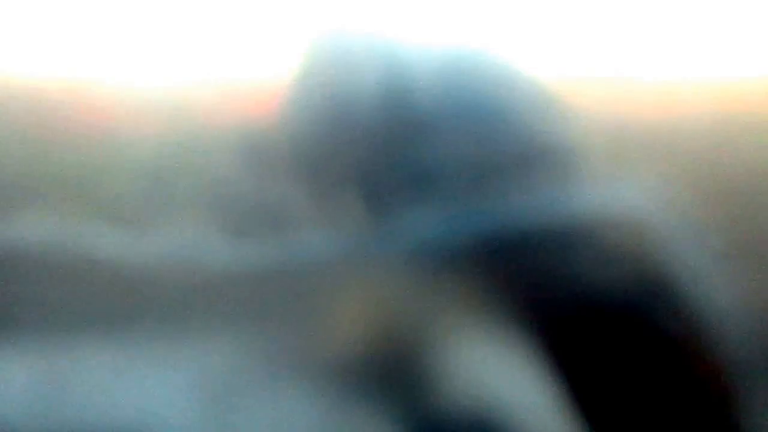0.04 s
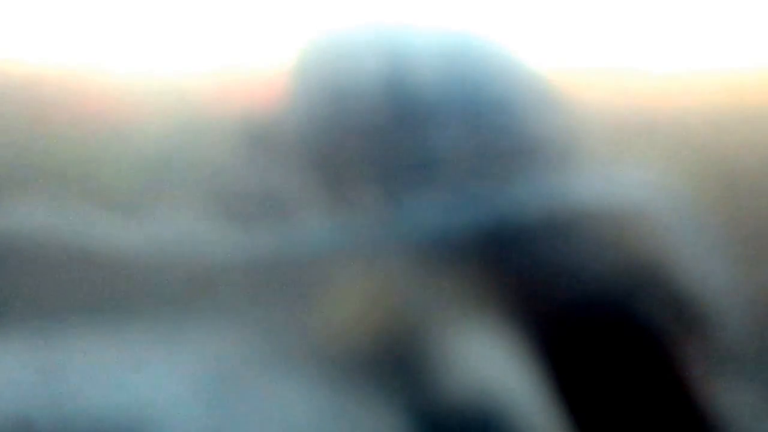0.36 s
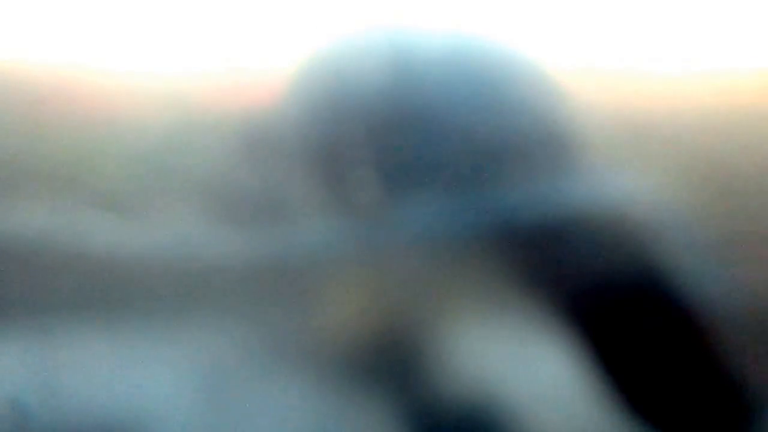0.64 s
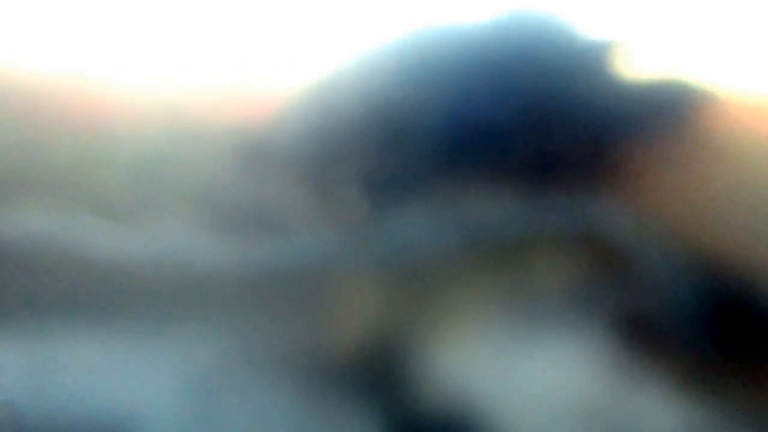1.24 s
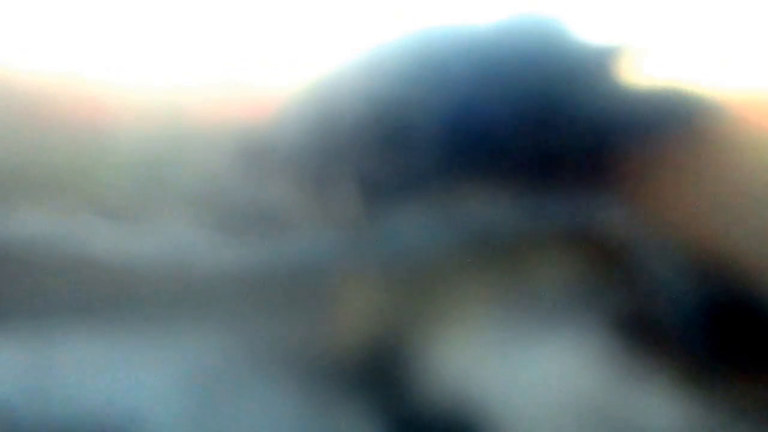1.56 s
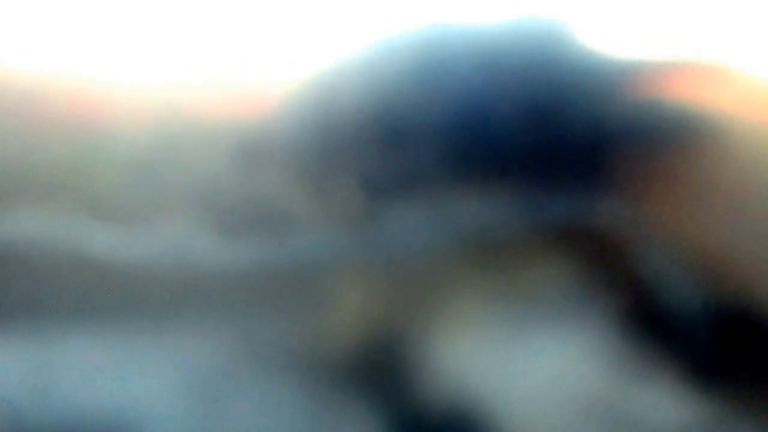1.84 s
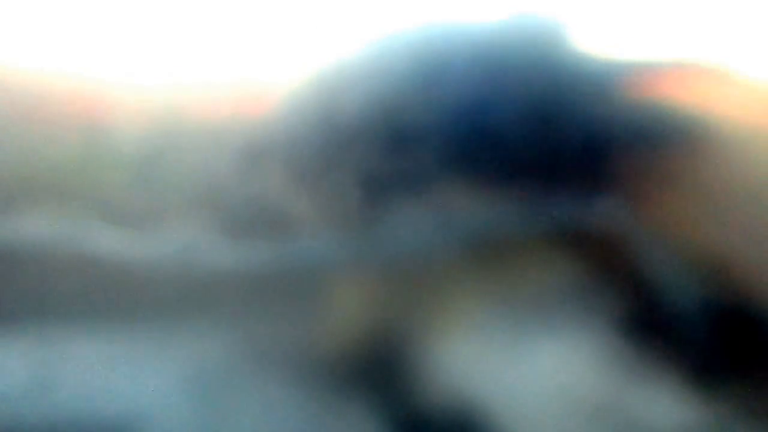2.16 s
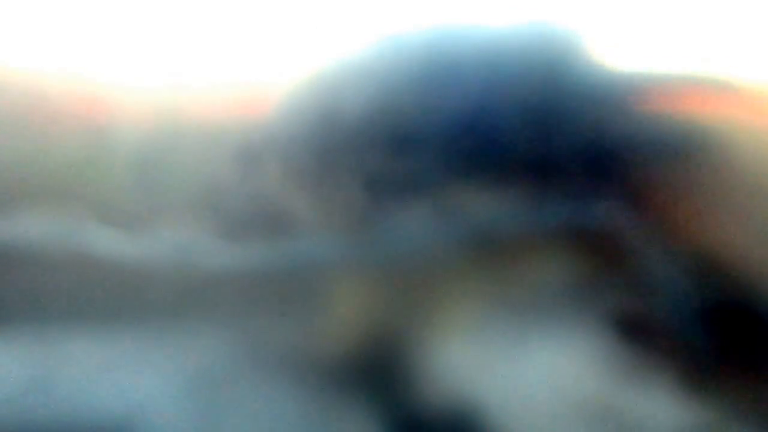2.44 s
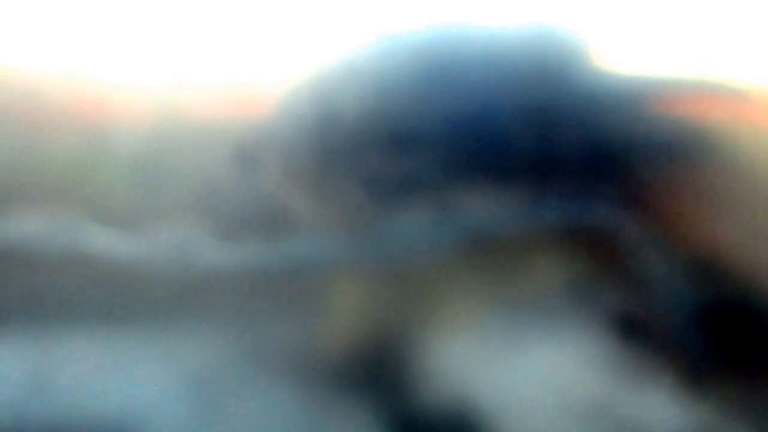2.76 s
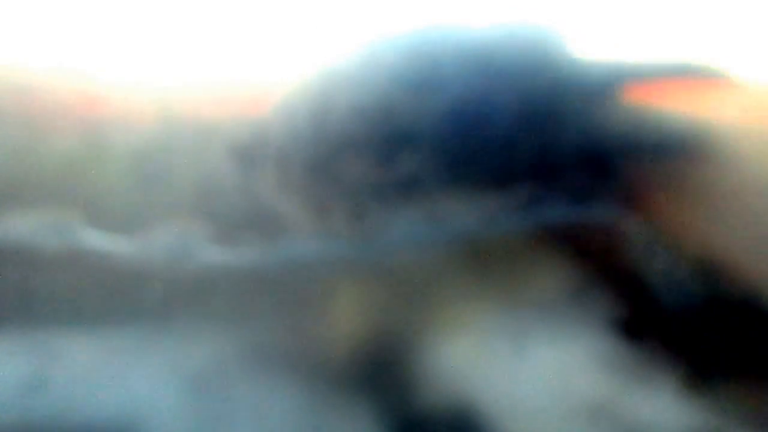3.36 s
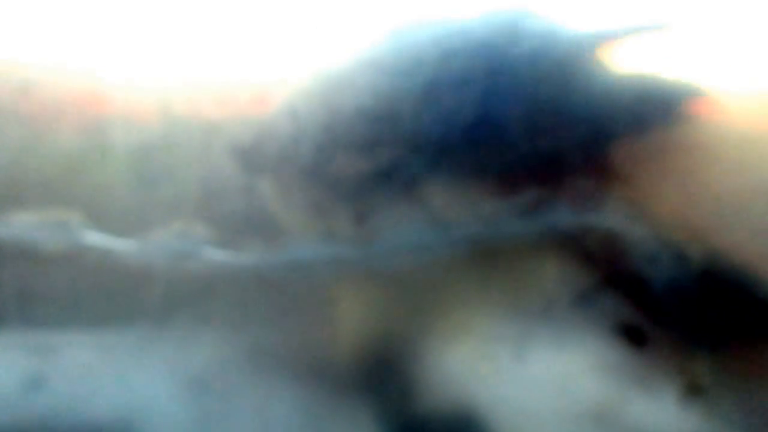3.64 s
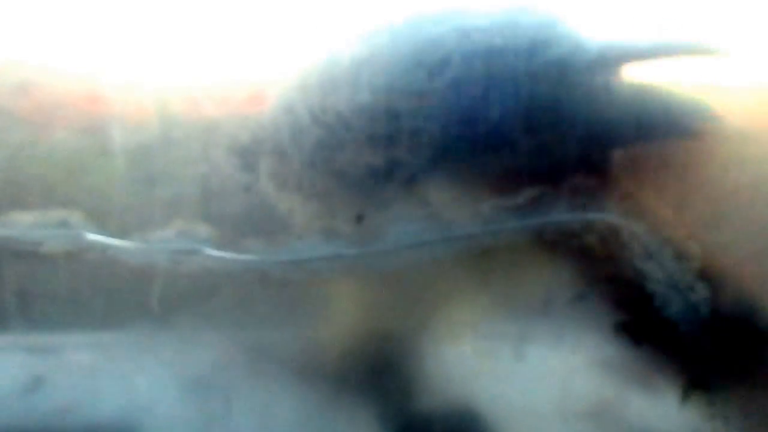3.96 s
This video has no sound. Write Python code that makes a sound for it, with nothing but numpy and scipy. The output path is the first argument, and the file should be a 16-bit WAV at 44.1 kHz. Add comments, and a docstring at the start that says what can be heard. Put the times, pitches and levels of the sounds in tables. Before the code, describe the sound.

A low rumble of distant traffic cuts in at 0.2 seconds and holds steady, with microphone hiss and a machinery hum that comes and goes. Close by, a camcorder's lens motor ticks faintly and irregularly until 2.8 seconds. Its housing gives small dull clicks at about 0.6, 0.7 and 2.2 seconds. From 3 seconds a faint, thin motor whine runs to the end at 4 seconds.

```python
"""Camcorder in distant traffic

A camcorder starts up in the steady rumble of far traffic and machinery, whose hum comes and goes.
Right by its microphone the lens motor ticks in single steps, hunting for focus, then runs with a
thin whine. The housing clicks three times; electronic hiss and a faint line whistle lie over it all."""
import sys
import numpy as np
from scipy.fft import rfft, irfft, next_fast_len
from scipy.io import wavfile
from scipy.ndimage import map_coordinates

SR = 44100
rng = np.random.default_rng(int(sys.argv[2]) if len(sys.argv) > 2 else 0)


def persist_wave(psi):
    """Save psi, clipped to +-1, as 16-bit WAV."""
    counts = np.round(np.clip(psi, -1, 1) * 32767).astype(np.int16)
    wavfile.write(sys.argv[1], SR, np.atleast_2d(counts).T)


N = 176400
T = np.arange(N) / SR

# Spectrum of the traffic's low rumble, far off: frequency_hz, relative_db
RUMBLE_SPECTRUM = [(10, -21), (20, 0), (32, -2.5), (50, -2), (86, 0), (113, 0.4), (140, 0.8), (175, 0),
                   (210, -6), (260, -11), (330, -17), (380, -23), (490, -50.5)]
# Spectrum of tyres on the distant road: frequency_hz, relative_db
TYRE_SPECTRUM = [(240, -43), (400, 0), (510, 0.5), (663, -2), (743, 1), (960, 0), (1050, 3), (1220, -7),
                 (1520, -2), (1720, -7), (1830, -16.5), (2000, -19), (2600, -27.5), (4400, -120)]
# Shape of the rumble's swell, tripled about its mean when played: time_s, relative_db
RUMBLE_SWELL = [(.25, -38.5), (.6, -38.5), (1, -38.5), (1.5, -37.5), (1.85, -38), (2.2, -38), (2.7, -38.5),
                (3.35, -37.5), (4, -38.5)]

def traffic(rumble_db=-39, roar_db=-49.5):
    """Distant traffic: a slowly swelling rumble under the even roar of tyres."""
    shape_db = curve(RUMBLE_SWELL)
    swell_db = 3 * (shape_db - shape_db.mean())
    rumble = amp(rumble_db + swell_db + 0.17 * wobble(7.8)) * noise(RUMBLE_SPECTRUM)
    roar = amp(roar_db + 0.3 * wobble(10)) * noise(TYRE_SPECTRUM)
    return rumble + roar


# Steady drone bands of distant machinery: pitch_hz, width_hz, level_db
DRONE_BANDS = [(28, 18, -48.5), (95.1, 8.1, -48), (234.7, 14.3, -55.5), (270.8, 7.8, -63), (300.5, 19, -61),
               (471.3, 5.5, -71), (529, 21, -74), (743, 1.4, -67), (1061, 12, -66.5)]
# Its low throbbing note, as it reaches the microphone: time_s, level_db
THROB_LEVELS = [(.25, -64), (.6, -52), (1, -44.5), (1.15, -50), (1.45, -52), (1.85, -42.5), (2.05, -49),
                (2.28, -66), (2.42, -44), (2.85, -49), (3.35, -43), (3.6, -48), (4, -53)]
# Its higher hum, coming and going: time_s, level_db
HUM_LEVELS = [(.25, -64.5), (.48, -54.5), (.75, -57), (.95, -76), (2, -76), (2.3, -54), (2.6, -69),
              (2.9, -57), (3.35, -53.5), (3.55, -64), (4, -61)]

def machinery(hum_hz=374.3, throb_hz=142.76):
    """Far machines: a blurred drone, with a hum and a throb that waver in pitch and level."""
    hum_gain = amp(curve(HUM_LEVELS) + 1.2 * wobble(20))
    hum = hum_gain * tone(hum_hz + 1.69 * wobble(9.2))
    throb_gain = amp(curve(THROB_LEVELS) + 2 * wobble(12))
    throb = throb_gain * tone(throb_hz + 3.8 * wobble(16))
    return fuzzy_lines(DRONE_BANDS) + throb + hum


# Single focus steps, right beside the microphone: start_s, relative_db, brightness_db
FOCUS_STEPS = [(.221, -45, 4), (.2607, -49, 0), (.3412, -44, -3), (0.3814, -46, -2), (0.461, -47, 2),
               (.501, -50, 2), (.5412, -47, -2), (0.5973, -44, 0), (0.661, -45, -1), (0.861, -48, 2),
               (1.088, -45.5, -1), (1.141, -44, -1), (1.221, -47.5, 1), (1.2616, -52, 0), (1.341, -45, -6),
               (1.381, -45, -4), (1.5012, -49.5, 2), (1.5812, -47.5, 3), (1.781, -54, 0), (1.8212, -49, 2),
               (2.0615, -50, 0), (2.1015, -52, 7), (2.141, -47, 9), (2.2215, -45.5, 8), (2.5412, -47, 6),
               (2.6215, -51, 15), (2.7015, -49, 6), (2.765, -53, 7), (2.822, -46, 4)]
# Resonances of the lens barrel: pitch_hz, relative_db, t60_s
BARREL_MODES = [(2750, -5.5, 0.016), (3070, -2.5, 0.0047), (3400, -1, 0.0066), (4000, -10, 0.0046),
                (5200, -7, 0.0028), (6670, -4.5, 0.0025)]
# Whine of the running motor: time_s, level_db
WHINE_LEVELS = [(2.88, -95), (2.97, -74), (3.11, -73), (3.135, -68), (3.5, -67.5), (3.7, -67), (4, -68.5)]

def lens_motor(whine_hz=2880, step_gain_db=4):
    """Single steps of the motor ring the barrel; continuous running gives a pure whine."""
    whine_gain = amp(curve(WHINE_LEVELS) + 0.64 * wobble(12))
    out = whine_gain * np.sqrt(2) * np.sin(2 * np.pi * whine_hz * T)
    for start_s, relative_db, brightness_db in FOCUS_STEPS:
        tick = ring(BARREL_MODES, attack_s=0.00012, bright_db=brightness_db, split_hz=4400)
        add(out, start_s, amp(relative_db + step_gain_db) * tick)
    return out


# Clicks in the body that holds the microphone: start_s, relative_db, brightness_db
HOUSING_CLICKS = [(0.5987, -38, -1), (.6825, -42.5, 8), (2.221, -44, 9)]
# Resonances of that body: pitch_hz, relative_db, t60_s
HOUSING_MODES = [(870, 2, .026), (1310, -2, 0.018), (1570, 2, 0.0091), (2200, -6, .01), (2850, -12, .007)]

def housing():
    """Small dull knocks ring the camera body, very close."""
    out = np.zeros(N)
    for start_s, relative_db, brightness_db in HOUSING_CLICKS:
        knock = ring(HOUSING_MODES, attack_s=0.00031, bright_db=brightness_db, split_hz=1900)
        add(out, start_s, amp(relative_db) * knock)
    return out


# Hiss of the microphone's preamplifier: frequency_hz, relative_db
HISS_SPECTRUM = [(1500, -11), (1850, 3), (2400, -0.5), (3000, -1.4), (4000, -3.5), (7300, -6.5),
                 (7650, -6.5), (7850, -15), (8150, -6.5), (11500, -12.5), (15500, -29)]
# Noisy skirt around the weak whistle: pitch_hz, width_hz, level_db
WHISTLE_SKIRT = [(3150, 240, -76)]

def electronics(hiss_db=-61, whistle_hz=3100, whistle_db=-77, line_hz=15734, line_db=-79.5):
    """The camera's circuits add hiss, a weak unsteady whistle and the high line-scan tone."""
    whistle = amp(whistle_db + 1.8 * wobble(17)) * np.sin(2 * np.pi * whistle_hz * T)
    line_tone = amp(line_db) * np.sin(2 * np.pi * line_hz * T)
    hiss = amp(hiss_db) * noise(HISS_SPECTRUM)
    return hiss + np.sqrt(2) * (whistle + line_tone) + fuzzy_lines(WHISTLE_SKIRT)


def ring(modes, attack_s, bright_db, split_hz):
    """A tapped plastic part rings; brightness lifts modes above the split and thins those below."""
    t = np.arange(SR // 20) / SR
    out = np.zeros(len(t))
    for k, (pitch_hz, relative_db, t60_s) in enumerate(modes):
        tilt_db = bright_db * ((pitch_hz > split_hz) - 0.4)
        level_db = relative_db + rng.normal(0, 1) + tilt_db
        detuned_hz = pitch_hz * rng.normal(1, 0.02)
        decay = amp(level_db - 60 * t / t60_s)
        out += (-1) ** k * decay * np.sin(2 * np.pi * detuned_hz * t)
    return out * (1 - np.exp(-t / attack_s))


def amp(db):
    """Decibels to gain."""
    return 10 ** (np.asarray(db) / 20)


def unit(x):
    """Scale to rms 1."""
    return x / np.sqrt(np.mean(x ** 2) + 1e-20)


def curve(rows):
    """(s, value) points as one value per sample."""
    return np.interp(T, *np.transpose(rows))


def wobble(rate):
    """A smooth random curve, rate knots a second."""
    return map_coordinates(rng.standard_normal(int(N * rate / SR) + 4), [T * rate])


def tone(hz):
    """A sine of rms 1 that follows a pitch curve."""
    return np.sqrt(2) * np.sin(2 * np.pi * np.cumsum(hz) / SR)


def filtered(x, response):
    """x times a response of frequency."""
    m = next_fast_len(N + 8192)
    return irfft(rfft(x, m) * response(np.fft.rfftfreq(m, 1 / SR)), m)[:N]


def noise(spectrum):
    """Noise of rms 1 with the given (Hz, dB) colour."""
    f, db = np.transpose(spectrum)
    colour = lambda hz: amp(np.interp(np.log(hz + 1), np.log(f + 1), db, left=-120))
    return unit(filtered(rng.standard_normal(N), colour))


def fuzzy_lines(rows):
    """Narrow bands of noise, each heard as a blurred pitch."""
    out = np.zeros(N)
    for pitch_hz, width_hz, level_db in rows:
        peak = lambda hz: 1 / (1 + (2 * (hz - pitch_hz) / width_hz) ** 2)
        out += amp(level_db) * unit(filtered(rng.standard_normal(N), peak))
    return out


def add(track, s, sound):
    """Mix a sound into the track at time s."""
    part = track[round(s * SR):][:len(sound)]
    part += sound[:len(part)]


def scene():
    """Far traffic and machinery meet the camera's own sounds at its one microphone."""
    return (traffic() + machinery() + lens_motor() + housing() + electronics())[None]


def record(dry):
    """Silent until the camera comes on; nothing passes above its band limit."""
    start_s, fade_in_s, top_hz = 0.2055, 0.0027, 15830
    switched_on = np.clip((T - start_s) / fade_in_s, 0, 1)
    return filtered(dry[0] * switched_on, lambda hz: 1 / (1 + (hz / top_hz) ** 600))[None]


dry = scene()
out = record(dry)
persist_wave(out)
```